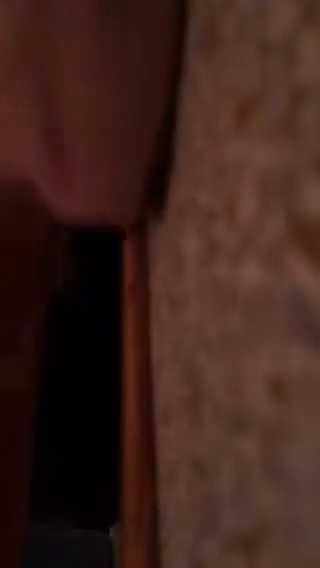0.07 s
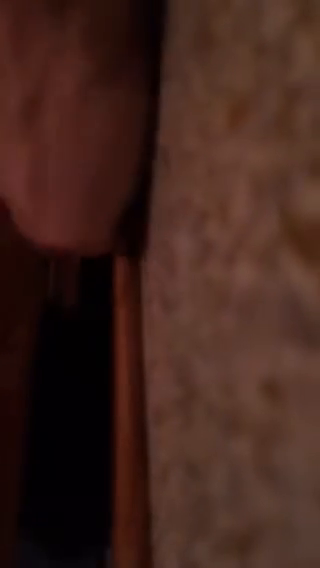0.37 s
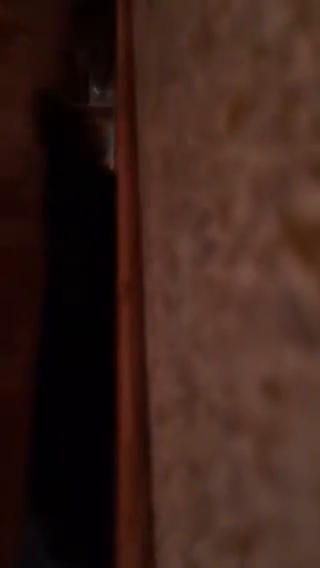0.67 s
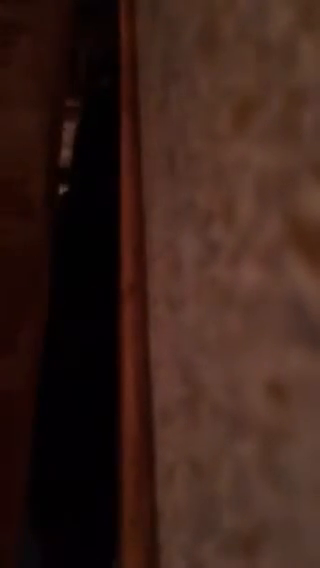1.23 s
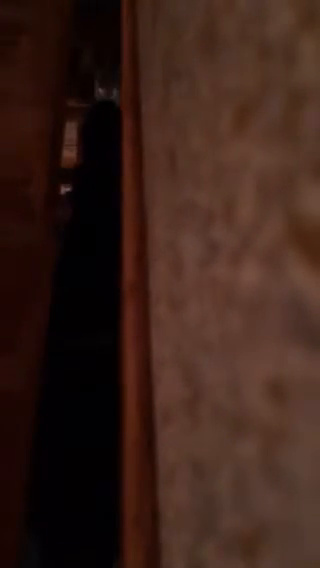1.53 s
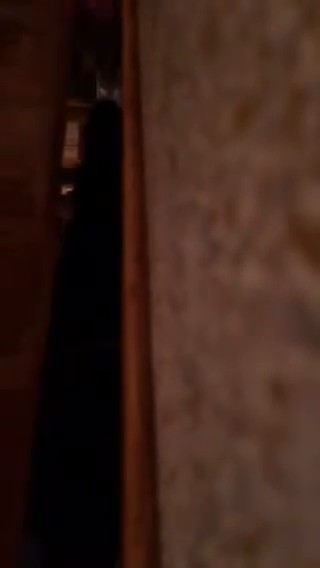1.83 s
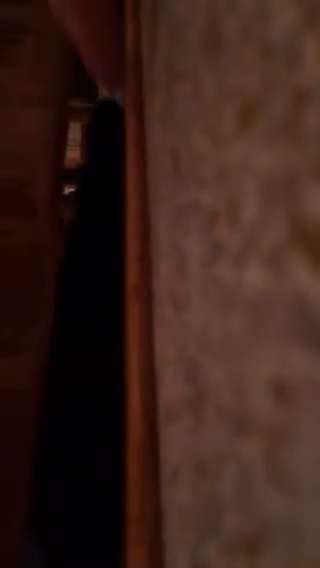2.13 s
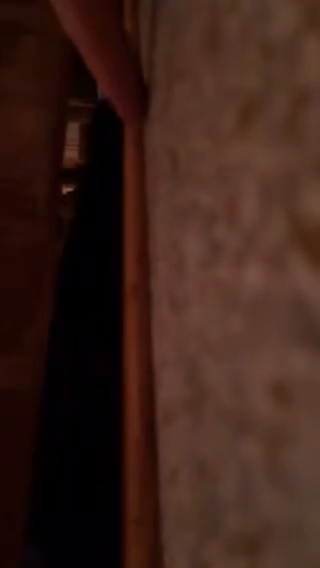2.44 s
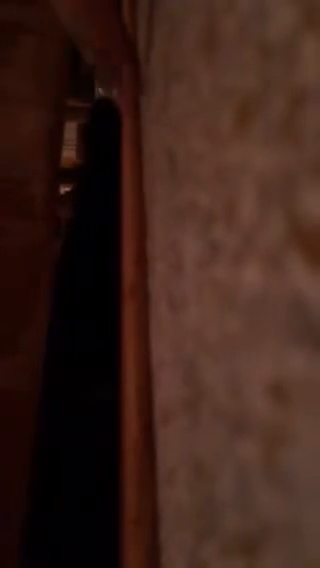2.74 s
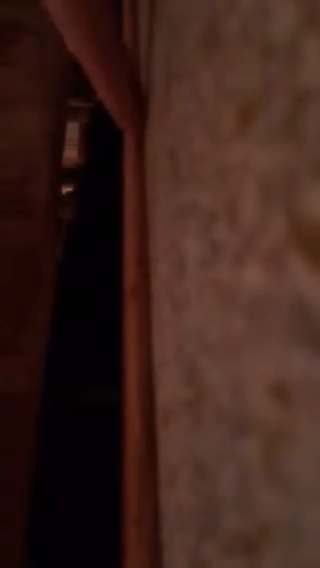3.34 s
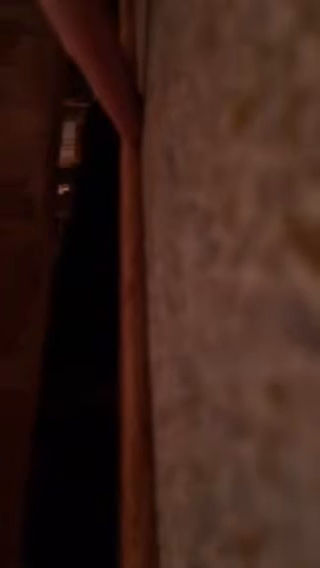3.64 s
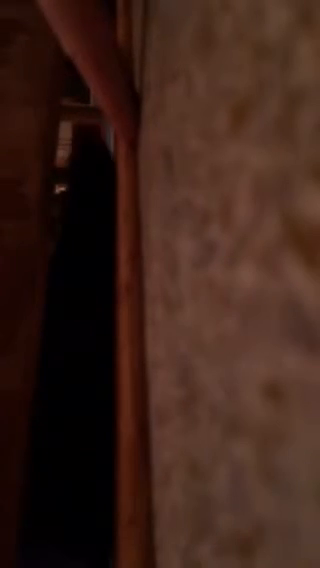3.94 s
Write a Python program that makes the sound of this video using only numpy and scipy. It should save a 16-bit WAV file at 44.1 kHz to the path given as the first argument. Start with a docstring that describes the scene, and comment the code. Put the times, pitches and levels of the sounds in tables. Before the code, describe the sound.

Fingers rub twice along a wooden door edge, with one sharp knock and light scratches.

```python
"""Two firm, hissing strokes of fingers along a wooden door edge, with one sharp knock between them.
Light brushes and small fingernail ticks follow. The hiss is skin making countless tiny slips on
the wood; the knock and the ticks set the door ringing. All the while the hand bumps dully on the
microphone it holds, over a low rumble and the faint noise of a quiet room."""
import sys
import numpy as np
from scipy import signal
from scipy.fft import rfft, irfft, next_fast_len
from scipy.io import wavfile
from scipy.ndimage import map_coordinates

SR = 44100
rng = np.random.default_rng(int(sys.argv[2]) if len(sys.argv) > 2 else 0)


def unload_audio(sound):
    """Save the sound as a 16-bit wav file, at the path given as the first command line argument."""
    columns = np.transpose(np.atleast_2d(sound))
    # keep every value between -1 and 1, then stretch to whole-number steps
    steps = np.round(np.clip(columns, -1, 1) * 32767)
    wavfile.write(sys.argv[1], SR, steps.astype(np.int16))


N = 176400  # 4 seconds
TOP_HZ = 15400

# One list for each firm stroke. Each row: time in seconds, level in dB.
STROKE_LEVELS = [
    [(0.0, -46.5), (0.086, -44), (0.19, -44), (0.322, -50), (0.335, -53)],
    [(0.41, -67), (0.44, -65.5), (0.52, -63), (0.594, -40.5), (0.65, -45.5), (0.704, -46), (0.782, -60),
     (0.8, -69)],
]
# Each stroke's tone. Each row: tilt in dB per octave (higher is brighter), rasp in Hz, rasp boost in dB.
STROKE_TONES = [(.1, 2890, 0), (.1, 6570, 2.5)]
def firm_strokes():
    """The whole hand rubs twice; skin sticks and slips, so the hiss is slightly gritty."""
    t, out = since(0), np.zeros(N)
    for stroke, tone in zip(STROKE_LEVELS, STROKE_TONES):
        times, db = np.transpose(stroke)
        seconds_outside = np.abs(t - np.clip(t, times[0], times[-1]))
        fade = np.exp(-seconds_outside / 0.02)
        out += amp(np.interp(t, times, db)) * fade * rub(friction(), *tone)
    return out * amp(0.56 * wobble(per_second=220))


def friction(slips_per_second=2500, share=0.22):
    """Countless tiny slips of skin blur into a hiss; larger ones carry a share of the power."""
    large = (rng.random(N) < slips_per_second / SR) * rng.standard_normal(N)
    tiny = rng.standard_normal(N)
    return np.sqrt(share) * unit(large) + np.sqrt(1 - share) * tiny


# The tone of skin on wood. Each row: frequency in Hz, level in dB.
SKIN_TONE = [(1060, -41.5), (1800, -2), (2210, -8.5), (2530, -5), (3140, -7.5), (3990, -6), (5000, -4),
             (5660, -3), (8250, -0.5), (11900, -2), (14600, -4.5), (15300, -6)]
def rub(slips, tilt, rasp_hz, rasp_db):
    """The slips take on the tone of skin on wood; the nail adds a rasp around one pitch."""
    def gain(hz):
        octaves_away = np.log2((hz + 1) / rasp_hz)
        rasp = rasp_db * np.exp(-.5 * (octaves_away / 0.37) ** 2)
        return amp(along(SKIN_TONE, hz) + rasp) * tilted(hz, tilt, low_hz=1950)
    return unit(filtered(slips, gain))


# The tone of the knock's crack. Each row: frequency in Hz, level in dB.
CRACK_TONE = [(290, -49.5), (500, -7), (813, -37.5), (1480, 1.5), (2220, -22.5), (2950, 2.5), (3500, -16.5),
              (4340, -5.5), (4870, -13), (7060, -9), (7700, -12.5), (8270, -7.5), (10400, -27),
              (11200, -11.5), (12000, -14.5), (12900, -17), (15300, -24.5)]
# The tone of the room's answer to the knock. Each row: frequency in Hz, level in dB.
ECHO_TONE = [(88, -24), (150, -23.5), (263, -2.5), (338, -6), (518, -11.5), (856, -15.5), (1390, -11),
             (1790, -23), (1890, -18), (3870, -27.5), (8560, -23.5), (15300, -32.5)]
def knock(start=0.3495):
    """A short scrape runs into a crack; the door rings and the room answers."""
    t = since(start)
    scrape = amp(-27) * (t < 0) * np.exp(-np.abs(t) / 0.0049)
    crack = amp(-17) * decay(start, fade_seconds=0.021)
    rebound = amp(-35) * decay(start + 0.016, fade_seconds=0.021)  # the nail touches once more
    crack_noise = unit(filtered(noise(CRACK_TONE), lambda hz: tilted(hz, 0, low_hz=910)))
    contact = (scrape + crack + rebound) * crack_noise
    echo = np.pad(room_tail(noise(ECHO_TONE)), (round(start * SR), N))[:N]
    return contact + amp(-26.5) * door_ring(start, fade_scale=0.9) + amp(-30) * echo


# The door's own notes. Each row: pitch in Hz, level in dB, seconds to fade 60 dB (before fade_scale).
DOOR_NOTES = [(240.7, -11.5, 0.25), (287, -11.5, 0.18), (358.7, -10.5, 0.16), (462.3, -11, 0.24),
              (558, -14, 0.13), (713, -21, .3), (924, -25, 0.86), (1060, -23, 0.18), (1272, -3, 0.11),
              (1410, -9, 0.045), (1484, 3, 0.074), (1856, -14.5, .14), (2070, -17.5, .12), (2200, -14, .13),
              (2392, -16.5, 0.12), (2800, -4.5, 0.02), (3150, -2.5, 0.021), (3370, -16, .08),
              (4510, -15.5, 0.064), (5782, -22, 0.086), (6830, -13.5, .085), (8330, -20.5, 0.087),
              (11200, -22, .1)]
def door_ring(start, fade_scale):
    """The struck door rings with many notes at once; a resting finger shortens them."""
    t = since(start)
    ringing = (t >= 0) & (t < .5)
    out, t = np.zeros(N), t[ringing]
    for hz, db, fade_seconds in DOOR_NOTES:
        drift = 0.57 * np.interp(t, np.linspace(0, .5, 64), rng.standard_normal(64))
        fade = np.exp(-np.log(1000) * t / (fade_seconds * fade_scale))
        out[ringing] += amp(db) * fade * np.sin(2 * np.pi * hz * t + drift)
    return out


# Light brushes and scratches. Each row: peak time, rise and fall in seconds, level in dB,
# tilt in dB per octave, rasp in Hz, rasp boost in dB.
LIGHT_BRUSHES = [(.83, .03, 0.1, -68, -5, 3000, -7.5), (1.18, .05, 0.061, -68.5, -7, 4500, 2),
                 (1.262, 0.036, 0.052, -55.5, -2.5, 4440, 2.5), (1.40, 0.081, 0.15, -73, -5.5, 4000, 7),
                 (1.635, 0.027, 0.028, -75.5, -2.5, 5440, 4), (1.88, 0.037, 0.061, -68, -7.5, 5500, 2),
                 (2.11, 0.19, 0.12, -71, -9, 4330, 7.5), (2.2, 0.032, 0.079, -61, -4.5, 4520, 3.5),
                 (2.31, 0.035, 0.061, -66, -6, 4530, -1), (2.60, 0.052, 0.071, -68, -7.5, 3600, 9.5),
                 (2.67, 0.042, 0.19, -71, -5, 4200, 5), (2.808, .008, 0.011, -61, 10, 4500, -5),
                 (2.855, 0.066, 0.061, -62.5, -4, 2960, 4), (2.915, 0.017, .017, -71, 5.5, 4500, 3),
                 (3.082, 0.034, 0.05, -70.5, -5, 2800, 5), (3.227, 0.019, 0.025, -60.5, 0.5, 4500, 0),
                 (3.3, 0.04, 0.077, -58, -3, 3500, 1), (3.41, 0.051, 0.07, -68, -4, 4500, 0),
                 (3.70, 0.02, .05, -70.5, -6, 4700, 10), (3.785, .04, 0.026, -67, -10.5, 4670, 7),
                 (3.97, 0.11, .04, -73.5, -8.5, 7300, 1)]
def brushes():
    """A fingertip brushes the edge; its hiss swells and fades a little unevenly."""
    out, slips = np.zeros(N), friction()
    for peak, rise, fall, db, *tone in LIGHT_BRUSHES:
        t = since(peak)
        swell = np.exp(-.5 * (t / np.where(t < 0, rise, fall)) ** 2)
        out += amp(db) * swell * rub(np.roll(slips, rng.integers(N)), *tone)
    return out * amp(1.4 * wobble(per_second=110))


# The nail's catches. Each row: start in seconds, strength in dB, tilt in dB per octave.
NAIL_TICKS = [(0.2788, -34.5, -7), (.331, -30, 7), (.808, -49, 0), (.841, -43.5, -1), (.958, -49.5, -1.5),
              (1.229, -46, 0), (1.266, -36, 2), (1.292, -44, 3.5), (2.091, -47, -6), (2.174, -45, -8),
              (2.401, -48, -3.5), (2.4365, -48, 1.5), (2.997, -46, -7.5), (3.2816, -36.5, -4.5),
              (3.288, -40, -2), (3.3041, -31, -3.1), (3.3214, -39.5, -4), (3.344, -42, 11),
              (3.359, -45, 10), (3.479, -44, 0), (3.505, -44.5, 0.5)]
def nail_ticks():
    """The nail catches on the grain in tiny bursts, each with a little room echo."""
    out = np.zeros(N)
    for start, db, tilt in NAIL_TICKS:
        burst = unit(filtered(rng.standard_normal(N), lambda hz: tilted(hz, tilt, low_hz=1100)))
        click = amp(-9.5) * decay(start, fade_seconds=0.013) * burst
        ring = amp(-18 - tilt) * door_ring(start, fade_scale=0.26)  # duller ticks stir the door more
        out += amp(db) * (click + ring)
    tail = room_tail(rng.standard_normal(N))
    echo = signal.fftconvolve(out, tail / np.linalg.norm(tail))[:N]
    return out + amp(-13.5) * echo


# Bumps on the microphone. Each row: time in seconds, push strength in dB, contact time in milliseconds.
HAND_BUMPS = [(0.127, -31, 0.97), (0.167, -29, 0.81), (0.2799, -27.5, 0.41), (0.291, -32, 0.29),
              (0.303, -40, .6), (0.403, -30, .6), (0.438, -28, 0.73), (0.461, -27, 0.52),
              (0.57, -34.5, 1.05), (.798, -33, 0.63), (0.909, -27, 1.2), (0.931, -30.5, 1),
              (1.042, -27, 2.3), (1.069, -24.5, 0.8), (1.076, -32, 0.98), (1.094, -29, 1),
              (1.138, -28.5, 1.7), (1.269, -25, 0.8), (1.564, -30, 2.5), (2.028, -24.5, 1.5),
              (2.122, -31.5, 0.9), (2.3452, -21.5, 0.33), (2.412, -23.5, 3.2), (2.698, -30, 1.94),
              (2.852, -34.5, 1.8), (3.169, -30.5, 1.05), (3.182, -32, 3.7), (3.2157, -20, 0.99),
              (3.513, -34.5, 1.2), (3.833, -33.5, 1), (3.844, -34, 0.9), (3.864, -29, 0.78),
              (3.986, -27, 1.03)]
def hand_bumps(body_hz=81, resonance=1.1):
    """Each soft push on the microphone swings back once; a shorter contact sounds harder."""
    pushes = np.zeros(N)
    for time, db, contact_ms in HAND_BUMPS:
        width_seconds = 2 * contact_ms / 1000
        pushes += amp(db) / (1 + (since(time) / width_seconds) ** 2) ** 2
    body = lambda hz: -hz ** 2 / (body_hz ** 2 - hz ** 2 + 1j * hz * body_hz / resonance)
    flesh = lambda hz: 1 / (1 + (hz / 750) ** 8)  # flesh mutes the treble
    return amp(2.5) * filtered(pushes, lambda hz: body(hz) * flesh(hz))


# Shifts of the grip. Each row: peak time in seconds, rise and fall time in seconds, level in dB.
GRIP_SHIFTS = [(0.307, 0.031, -35), (0.45, 0.022, -42.5), (0.885, 0.038, -50.5), (1.067, 0.089, -47.5),
               (1.52, 0.072, -53.5), (1.868, 0.081, -51), (3.115, 0.12, -47), (3.278, 0.017, -51),
               (3.841, .05, -48.5)]
# The tone of their rustle. Each row: frequency in Hz, level in dB.
GRIP_TONE = [(25, -16.5), (80, 7), (250, -0.5), (450, -12.5), (800, -26.5), (1400, -24.5), (3000, -42),
             (8000, -51)]
def grip_rustle():
    """The hand shifts on the microphone's body in short, low swells."""
    swells = sum(amp(db) * np.exp(-(since(peak) / width) ** 2) for peak, width, db in GRIP_SHIFTS)
    return noise(GRIP_TONE) * swells


# How long the room echoes. Each row: frequency in Hz, seconds to fade 60 dB.
ROOM_FADES = [(200, 0.29), (1200, 0.21), (4000, 0.22), (12000, 0.15)]
def room_tail(sound, build_seconds=0.011):
    """Shape noise into an echo that builds quickly and dies away, the low notes last."""
    hz, t, bands = signal.stft(sound[:SR // 2], SR, nperseg=256)
    fade = np.exp(-np.log(1000) * t / along(ROOM_FADES, hz)[:, None])
    tail = signal.istft(bands * fade, SR, nperseg=256)[1]
    build = 1 - np.exp(-np.arange(len(tail)) / SR / build_seconds)
    return tail * build


# The tones of the hand's rumble, the room's air and the hiss. Each row: frequency in Hz, level in dB.
RUMBLE_TONE = [(12, -56), (20, -29), (40, -5.5), (64, 3.5), (166, -9.5), (206, -17), (242, -13.5),
               (264, -20.5), (304, -16.5), (340, -50), (400, -27.5), (520, -67.5), (880, -120)]
AIR_TONE = [(180, -26.5), (300, -6.5), (570, -10), (639, -11.5), (903, -14.5), (1180, -16.5), (1610, -18.5),
            (1990, -21.5), (15300, -53)]
HISS_TONE = [(2500, -24), (4000, 3), (8000, -1), (15000, 0)]
# Faint drones in the room noise. Each row: pitch in Hz, width in Hz, relative level in dB.
ROOM_DRONES = [(236.7, 7.2, -62), (564.3, 60, -67), (931, 55, -73.5), (1414, 120, -70), (1564.5, 82, -68),
               (2620, 130, -82), (6820, 130, -88.5)]
def background():
    """The holding hand rumbles under the steady noise of the room and the microphone's own hiss."""
    rumble = amp(-45.5) * noise(RUMBLE_TONE)
    air = amp(-59.5) * noise(AIR_TONE)
    hiss = amp(-81.5) * noise(HISS_TONE)
    drones = np.zeros(N)
    for pitch, width, db in ROOM_DRONES:
        band = lambda hz: 1 / (1 + 2 * ((hz - pitch) / width) ** 2)
        drones += amp(db) * unit(filtered(rng.standard_normal(N), band))
    return rumble + air + hiss + amp(-0.5) * drones


def amp(db):
    """Turn decibels into a number to multiply by."""
    return 10 ** (np.asarray(db) / 20)


def unit(sound):
    """Scale a sound to an average power of 1."""
    return sound / np.sqrt(np.mean(sound ** 2) + 1e-20)


def along(table, hz):
    """Read between a table's rows, with frequency spaced in octaves."""
    frequencies, values = np.transpose(table)
    return np.interp(np.log(hz + 1), np.log(frequencies + 1), values)


def since(moment):
    """Seconds since a moment, for each sample."""
    return np.arange(N) / SR - moment


def decay(start, fade_seconds):
    """A level that jumps to 1, then drops 60 dB in fade_seconds."""
    t = since(start)
    return (t >= 0) * np.exp(-np.log(1000) * np.abs(t) / fade_seconds)


def wobble(per_second):
    """A smooth curve through random points."""
    points = rng.standard_normal(int(N * per_second / SR) + 4)
    return map_coordinates(points, [np.arange(N) * per_second / SR])


def filtered(sound, gain):
    """Turn each frequency up or down by gain(hz)."""
    size = next_fast_len(N + 8192)
    return irfft(rfft(sound, size) * gain(np.fft.rfftfreq(size, 1 / SR)), size)[:N]


def noise(tone):
    """Steady noise shaped by a tone table."""
    return unit(filtered(rng.standard_normal(N), lambda hz: amp(along(tone, hz))))


def tilted(hz, tilt, low_hz):
    """Brighten or dull by tilt dB per octave, cutting below low_hz and above TOP_HZ."""
    slope = amp(tilt * np.log2((hz + 1) / low_hz))
    low_cut = hz ** 3 / (hz ** 3 + low_hz ** 3)
    return slope * low_cut * (hz < TOP_HZ)


def scene():
    """All the sounds reach one microphone, which feeds both channels."""
    wood = firm_strokes() + knock() + brushes() + nail_ticks()
    mono = wood + hand_bumps() + grip_rustle() + background()
    return np.array([mono, mono])


def record(dry):
    """Cut away the treble above TOP_HZ."""
    return np.array([filtered(channel, lambda hz: hz < TOP_HZ) for channel in dry])


dry = scene()
out = record(dry)
unload_audio(out)
```